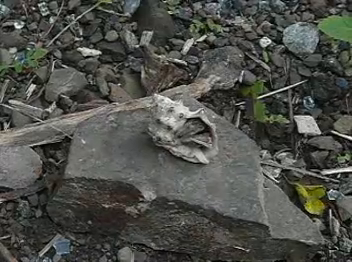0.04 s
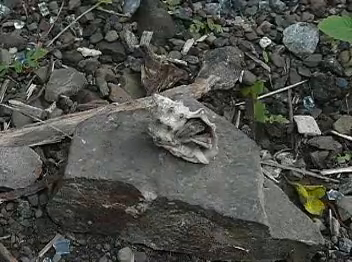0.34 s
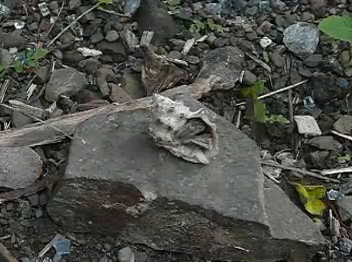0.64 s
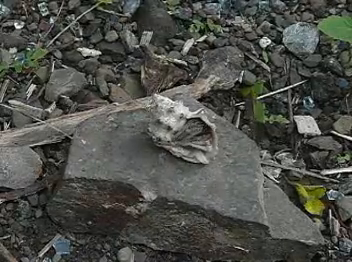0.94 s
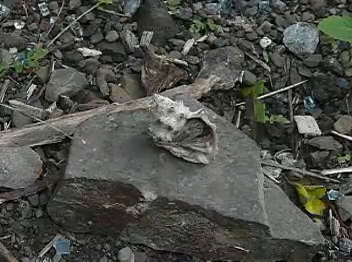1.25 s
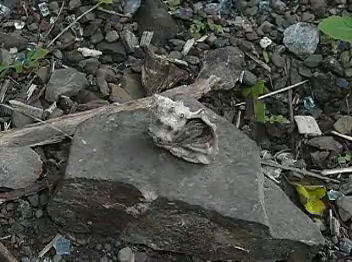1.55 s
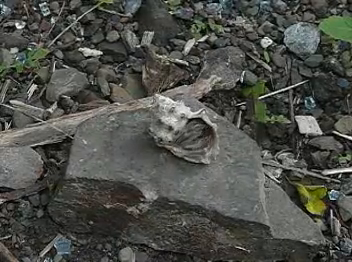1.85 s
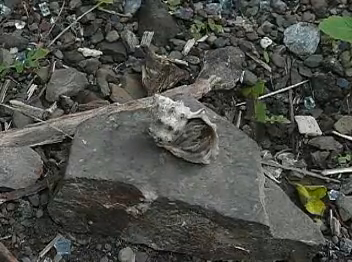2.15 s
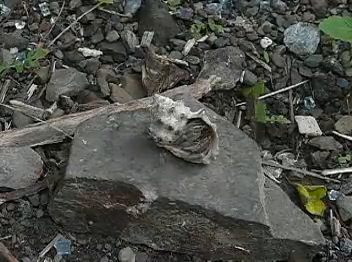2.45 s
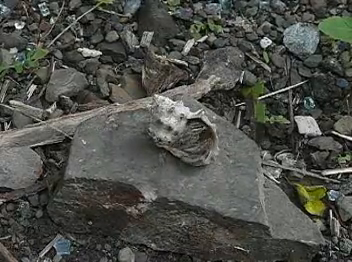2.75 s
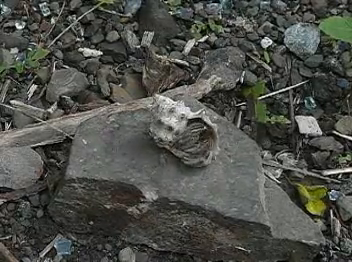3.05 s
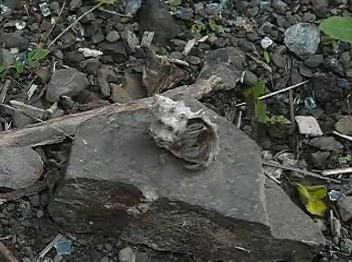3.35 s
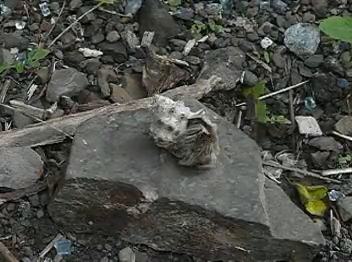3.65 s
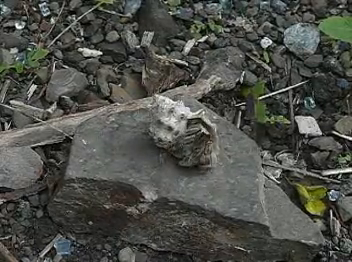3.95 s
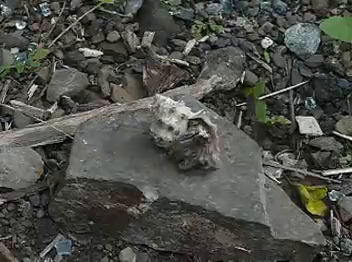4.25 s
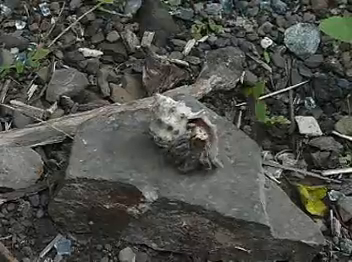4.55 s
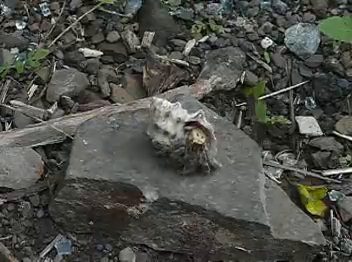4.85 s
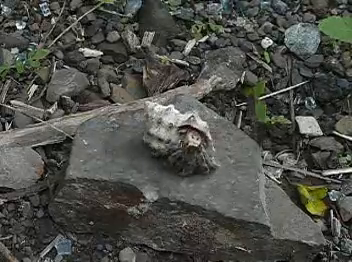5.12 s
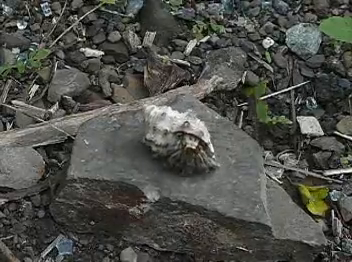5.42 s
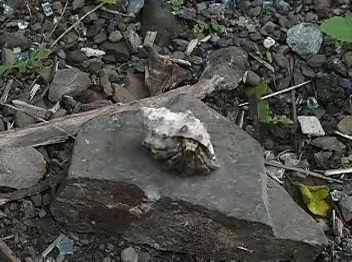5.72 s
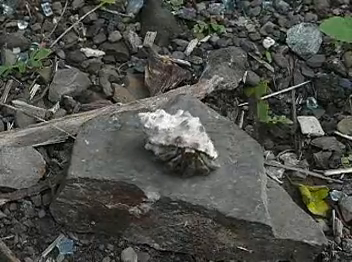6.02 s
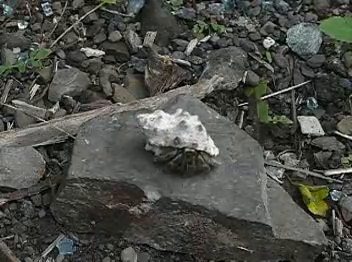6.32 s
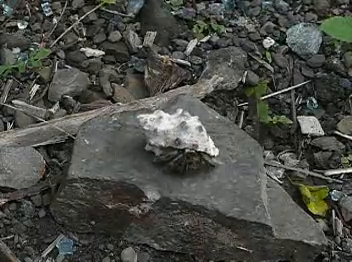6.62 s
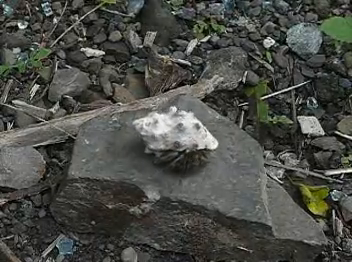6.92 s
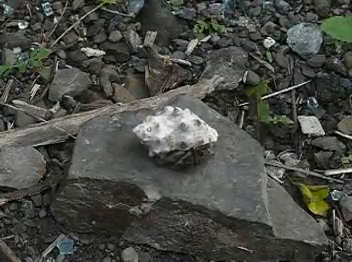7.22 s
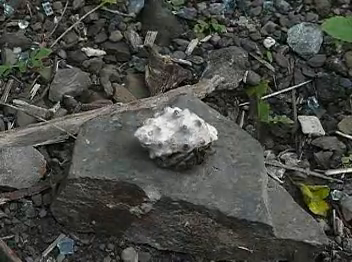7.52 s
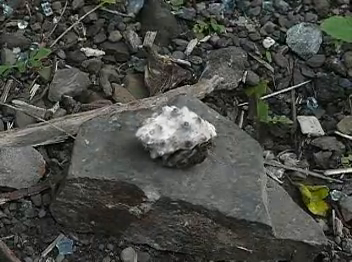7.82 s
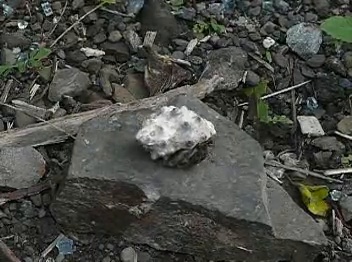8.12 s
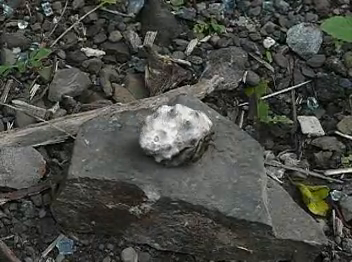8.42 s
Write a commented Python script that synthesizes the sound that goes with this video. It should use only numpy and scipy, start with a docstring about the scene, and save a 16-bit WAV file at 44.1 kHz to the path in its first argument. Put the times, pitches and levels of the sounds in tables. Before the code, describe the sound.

Outdoors, an unseen motor vehicle draws away, its exhaust droning over a roar of tyres and air. The engine speeds up slightly and the drone fades, leaving a low pulsing thud as the roar sinks into the open air. Close by, a hermit crab rights its shell on a rock with faint scrapes, ticks and three quick hollow knocks. A small camera microphone dulls the highs and adds a faint whine.

```python
"""An exhaust drones over the roar of tyres and air as a motor vehicle draws away, out of sight.
The engine speeds up a little and its drone fades, leaving a thud that beats against a second note.
The roar sinks with distance into the wash of the open air. Close by, a hermit crab rights its shell:
it scrapes and ticks faintly on the stone, then rolls over with hollow knocks.
A small camera hears it all, cutting off the highest sounds and adding a faint whine."""
import sys
import numpy as np
from scipy import signal
from scipy.fft import rfft, irfft, next_fast_len
from scipy.io import wavfile
from scipy.ndimage import map_coordinates

SR = 44100
rng = np.random.default_rng(int(sys.argv[2]) if len(sys.argv) > 2 else 0)


def generate_wav(sig):
    """Save sig (samples, or channels by samples) to the path in sys.argv[1] as 16-bit PCM at SR."""
    pcm = np.round(np.clip(np.atleast_2d(sig).T, -1, 1) * 32767).astype(np.int16)
    wavfile.write(sys.argv[1], SR, pcm)


N = 373527
T = np.arange(N) / SR


def gain(db):
    """Turn decibels into a number to multiply by."""
    return 10 ** (np.asarray(db) / 20)


def unit_level(x):
    """Scale a sound so that its average power is 1."""
    return x / np.sqrt(np.mean(x ** 2))


def curves(table):
    """Join a table's timed points with straight lines: one curve for each column after the time."""
    times_s, *columns = np.transpose(table)
    return [np.interp(T, times_s, column) for column in columns]


def drift(rate_hz):
    """A smooth random wander, roughly 1 either way, with rate_hz new values a second."""
    targets = rng.standard_normal(2048)
    return map_coordinates(targets, [T[::64] * rate_hz], order=3, mode="wrap").repeat(64)[:N]


def colour(x, points, edge_db_per_octave=0):
    """Make some pitches louder and others softer, following (pitch_hz, level_db) points."""
    size = next_fast_len(N)
    pitch_hz, level_db = np.transpose(points)
    octave = np.log2(np.maximum(np.fft.rfftfreq(size, 1 / SR), 1))
    point_octaves = np.log2(pitch_hz)
    octaves_outside = np.abs(octave - np.clip(octave, point_octaves[0], point_octaves[-1]))
    shape_db = np.interp(octave, point_octaves, level_db) - edge_db_per_octave * octaves_outside
    return irfft(rfft(x, size) * gain(shape_db), size)[:N]


def band(x, low_hz, high_hz):
    """Keep the part of a sound between two pitches."""
    edges_hz = [low_hz, max(high_hz, low_hz + 1)]
    return signal.sosfilt(signal.butter(2, edges_hz, "band", fs=SR, output="sos"), x)


def airy_noise(points, bands, flicker_db=0, flicker_hz=0):
    """Noise in side-by-side bands; each can waver by itself on its way through the air."""
    edges_hz = np.geomspace(points[0][0], points[-1][0], bands + 1)
    noise = sum(band(rng.standard_normal(N), low, high) * gain(flicker_db * drift(flicker_hz))
                for low, high in zip(edges_hz, edges_hz[1:]))
    return unit_level(colour(noise, points, edge_db_per_octave=24))


def echoing_tone(phase, depth=0.21, rate_hz=34):
    """A tone roughened by scattered echoes, which shake its loudness and timing."""
    echoes = 1 + depth * (drift(rate_hz) + 1j * drift(rate_hz))
    return (np.exp(1j * phase) * echoes).imag


# How fast the engine fires; it wavers, then speeds up a little: time_s, rate_hz
FIRING_RATE = [(0, 59.3), (.3, 57), (.43, 59.1), (.6, 57.4), (.77, 59.2), (1.3, 58.2), (1.65, 59.46),
               (2.2, 60), (2.42, 61.4), (2.77, 59.73), (2.92, 60.7), (3.3, 60.6), (4.3, 61.6)]
# The drone, at three times the firing rate, before drone_trim_db is added: time_s, level_db
DRONE_LEVEL = [(0, -21), (.52, -23), (.72, -27), (.87, -25), (1.22, -27.5), (1.42, -30.5), (1.85, -36),
               (1.98, -27), (2.12, -35.5), (2.35, -28), (2.57, -41.5), (2.72, -34.5), (2.82, -43),
               (2.93, -27.5), (3.0, -35), (3.17, -31), (3.55, -53)]
# Weaker tones, set against DRONE_LEVEL; half steps come from unequal cylinders: multiple, level_db
OVERTONES = [(1.5, -24), (2, -22), (2.5, -27.5), (3.5, -26.5), (4.5, -16.5), (6, -20.5)]
# A hollow hum at four times the firing rate, loudest as the engine reaches speed: time_s, level_db
HUM_LEVEL = [(0, -43), (2.0, -46.5), (2.6, -42), (3.0, -39), (3.23, -34.5), (3.45, -44.5), (4.3, -55.5)]
# The thud, at the firing rate itself, before thud_trim_db is added: time_s, level_db
THUD_LEVEL = [(0, -44.5), (1.1, -46.5), (1.65, -50), (2.3, -51.5), (2.75, -46), (3.15, -44.5),
              (3.95, -51.5), (4.3, -54.5)]


def exhaust(unevenness=0.005, drone_trim_db=-2.5, thud_trim_db=2.0, fade_db_per_s=6):
    """Slightly uneven firings thud down a pipe, which favours a drone at three times their rate."""
    firing_hz = curves(FIRING_RATE)[0] * (1 + unevenness * drift(18))
    phase = 2 * np.pi * np.cumsum(firing_hz) / SR
    drone = echoing_tone(3 * phase) * gain(drone_trim_db + 1.5 * drift(12))
    for multiple, level_db in OVERTONES:
        overtone = np.sin(multiple * phase + rng.uniform(0, 2 * np.pi))
        drone += overtone * gain(level_db + 2.0 * drift(7.1))
    drone *= gain(curves(DRONE_LEVEL)[0])
    hum = echoing_tone(4 * phase) * gain(curves(HUM_LEVEL)[0])
    thud = np.sin(phase) * gain(curves(THUD_LEVEL)[0] + thud_trim_db)
    # After the drone's last point, drone and hum fade with distance; the thud carries on.
    fade = gain(-fade_db_per_s * np.maximum(T - DRONE_LEVEL[-1][0], 0))
    return np.sqrt(2) * ((drone + hum) * fade + thud)


def boom(start_hz=253.1, rise_hz_per_s=2.4, width_hz=36):
    """A hollow band of noise whose pitch creeps up as the vehicle gathers speed."""
    smoothing = signal.butter(2, width_hz / 2, fs=SR, output="sos")
    slow_a, slow_b = signal.sosfilt(smoothing, rng.standard_normal((2, N)))
    phase = 2 * np.pi * np.cumsum(start_hz + rise_hz_per_s * T) / SR
    return unit_level(slow_a * np.cos(phase) + slow_b * np.sin(phase))


# The tone of the roar's low rumble: pitch_hz, relative_db
RUMBLE_COLOUR = [(46, -37.5), (78, -18), (86, -8.5), (113, -7), (177, 1.5), (220, 0), (259, -0.5),
                 (296, -3.5), (330, -4), (430, -31), (730, -120)]
# The tone of its broad middle: pitch_hz, relative_db
MIDDLE_COLOUR = [(160, -37.5), (280, -9), (302, -6.5), (350, -4), (383, -5), (430, -4), (506, -1.5),
                 (570, -4.5), (640, -5), (740, -6), (805, -4), (946, -10.5), (1100, -10.5), (1280, -9),
                 (1480, -12), (1800, -20), (2130, -20), (2600, -31.5), (4400, -120)]
# The tone of its high hiss: pitch_hz, relative_db
HISS_COLOUR = [(1000, -25.5), (1700, -5.5), (2430, -9), (2830, -5), (3460, -5), (3660, -6), (3990, -12.5),
               (5190, -38.5), (8780, -120)]
# Slow rises and dips in the roar: time_s, rumble_db, lower_middle_db, upper_middle_db, hiss_db
ROAR_SWELL = [(0, 0.5, 2, -4.5, 1.1), (1.4, -0.1, -3, 0, -1), (2.35, -0.3, 1.5, -0.9, 1.3),
              (3.2, 0.4, 0, 2, 0.5), (4.7, 0, 0.5, 3, 0), (5.45, 0.5, 1.8, 3.5, -0.3),
              (6.15, 0.7, 0.4, 2.5, 1.0), (7.7, -1.7, -0.3, 1.5, 0)]


def roar(start_m=22.8, speed_m_per_s=7.43, split_hz=1100):
    """Tyres and air make a rumble, a boom, a broad middle and a hiss, all sinking with distance."""
    rumble_db, lower_db, upper_db, hiss_db = curves(ROAR_SWELL)
    rumble = airy_noise(RUMBLE_COLOUR, bands=4, flicker_db=1.0, flicker_hz=11)
    middle = airy_noise(MIDDLE_COLOUR, bands=6, flicker_db=0.63, flicker_hz=12)
    hiss = airy_noise(HISS_COLOUR, bands=3, flicker_db=0.48, flicker_hz=24)
    lower = signal.sosfiltfilt(signal.butter(2, split_hz, fs=SR, output="sos"), middle)
    middle = lower * gain(lower_db) + (middle - lower) * gain(upper_db)
    # Each part has a base level and loses a few decibels whenever the distance doubles.
    doublings = np.log2(1 + speed_m_per_s * T / start_m)
    return (rumble * gain(-31.5 - 3 * doublings + rumble_db)
            + boom() * gain(-32 - 8 * doublings + 2.2 * rumble_db)
            + middle * gain(-26.5 - 6 * doublings)
            + hiss * gain(-36 - 6 * doublings + hiss_db))


# The tone of the open air: pitch_hz, relative_db
AIR_COLOUR = [(28, -12), (46, -4), (55, -9.5), (75, -2), (92, -10), (125, -2), (200, -2), (260, -4.5),
              (335, -1.5), (380, -3), (430, -2.5), (700, -9), (830, -4), (1100, -9), (1500, -18.5),
              (2100, -19), (3000, -34)]


def open_air(level_db=-42):
    """A faint, steady wash of outdoor air, uncovered as the vehicle leaves."""
    return gain(level_db) * airy_noise(AIR_COLOUR, bands=7)


def camera_whine(pitch_hz=3906, level_db=-63.5):
    """A faint, steady tone from the camera's electronics."""
    return np.sqrt(2) * gain(level_db) * np.sin(2 * np.pi * pitch_hz * T)


# A second engine note that comes up as the drone fades: time_s, level_db
SECOND_NOTE_LEVEL = [(0, -63.5), (3.8, -64.5), (5.3, -54), (8.4, -51)]


def second_engine_note(pitch_hz=64.5, overtone_db=-1, flutter_db=1.5, flutter_hz=5.6):
    """A note just above the thud, so the two pulse (beat) together, with one fluttering overtone."""
    phase = 2 * np.pi * pitch_hz * T
    overtone = np.sin(3 * phase) * gain(overtone_db + flutter_db * drift(flutter_hz))
    return np.sqrt(2) * gain(curves(SECOND_NOTE_LEVEL)[0]) * (np.sin(phase) + overtone)


def contact(start_s, rise_s, decay_s):
    """The loudness of one touch of shell on stone: it builds, then dies away."""
    age_s = np.maximum(T - start_s, 0)
    return np.minimum(age_s / rise_s, 1) * np.exp(-np.maximum(age_s - rise_s, 0) / decay_s)


# The shell's scrapes and ticks on the stone: start_s, level_db, rise_s, decay_s, pitch_hz
SCRAPES = [(5.08, -42.5, 0.031, 0.11, 3370), (5.359, -31.5, 0.0022, 0.0028, 2580),
           (5.668, -39, .019, .009, 2970), (5.80, -44.5, 0.073, .1, 3030), (6.375, -48, .01, .02, 3580),
           (7.795, -44, .005, 0.0081, 3000)]


def shell_scrapes(grain_db=0.5, grain_hz=300, width_ratio=1.17):
    """The shell's rim drags over the stone in short, gritty bursts."""
    grit = rng.standard_normal(N) * gain(-grain_db * drift(grain_hz))
    scrapes = np.zeros(N)
    for start_s, level_db, rise_s, decay_s, pitch_hz in SCRAPES:
        rasp = unit_level(band(grit, pitch_hz / width_ratio, pitch_hz * width_ratio))
        scrapes += gain(level_db) * contact(start_s, rise_s, decay_s) * rasp
    return scrapes


SHELL_HZ = 523  # the pitch at which the hollow inside the shell rings


def shell_roll(level_db=-35, width_ratio=1.25):
    """The knobbly shell rolls on the rock, and its hollow inside grumbles."""
    grumble = unit_level(band(rng.standard_normal(N), SHELL_HZ / width_ratio, SHELL_HZ * width_ratio))
    return gain(level_db) * contact(start_s=5.37, rise_s=0.075, decay_s=0.063) * grumble


# The shell's knocks on the rock as it rolls over: start_s, level_db
KNOCKS = [(5.381, -28), (5.469, -21), (5.552, -29)]


def shell_knocks(rise_s=0.0036, decay_s=0.0067):
    """The shell tips over and rocks; each soft bump briefly rings its hollow inside."""
    knocks = np.zeros(N)
    for start_s, level_db in KNOCKS:
        ring = np.sin(2 * np.pi * SHELL_HZ * (T - start_s))
        knocks += gain(level_db) * contact(start_s, rise_s, decay_s) * ring
    return knocks


def scene():
    """The far vehicle, the air, the whine and the nearby crab, in one channel."""
    background = exhaust() + roar() + open_air() + camera_whine() + second_engine_note()
    return (background + shell_scrapes() + shell_roll() + shell_knocks())[None]


# How the camera softens the highest sounds: pitch_hz, change_db
CAMERA_SMOOTHING = [(3600, 0), (4000, -5.5), (4400, -6), (5000, -17), (5500, -30.5), (6000, -45)]


def record(dry, sampling_hz=8000, top_hz=5800):
    """The camera's slow sampling mirrors the hiss above half its rate; filters then cut the top off."""
    below_half_rate = signal.ellip(10, 0.2, 60, sampling_hz / 2, fs=SR, output="sos")
    below_top = signal.ellip(8, 0.2, 70, top_hz, fs=SR, output="sos")
    narrow = signal.sosfilt(below_half_rate, dry[0])
    mirrored = narrow * (1 + 2 * np.cos(2 * np.pi * sampling_hz * T))
    return signal.sosfilt(below_top, colour(mirrored, CAMERA_SMOOTHING))[None]


dry = scene()
out = record(dry)
generate_wav(out)
```